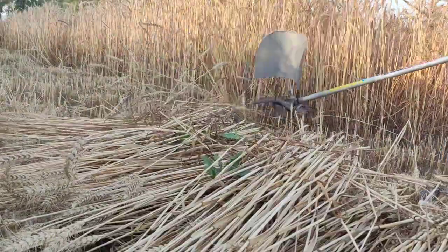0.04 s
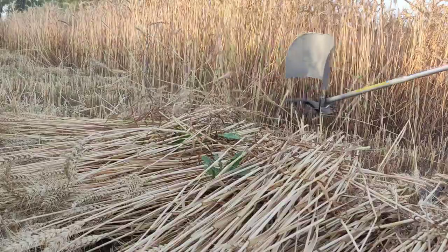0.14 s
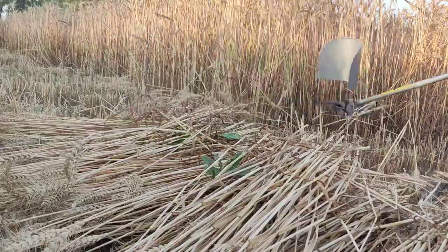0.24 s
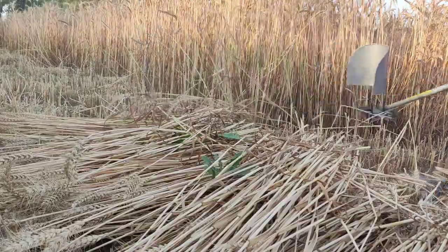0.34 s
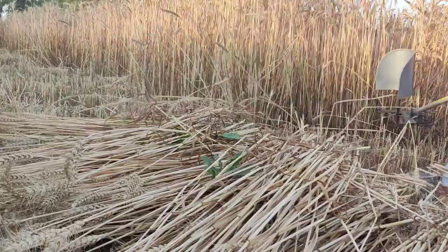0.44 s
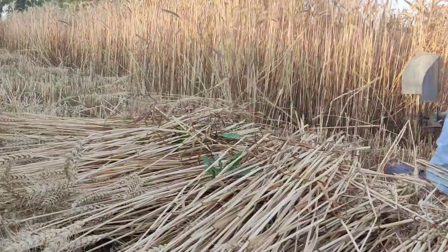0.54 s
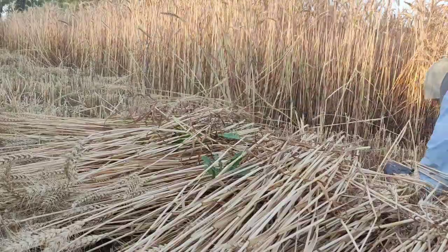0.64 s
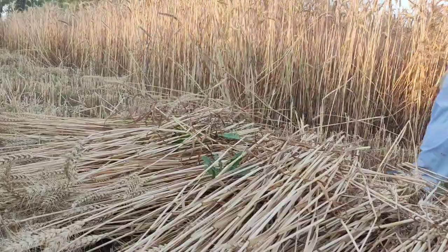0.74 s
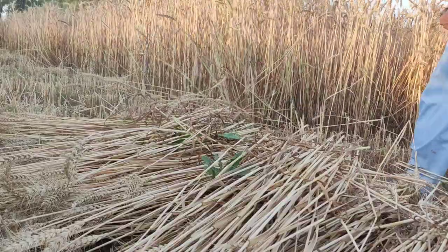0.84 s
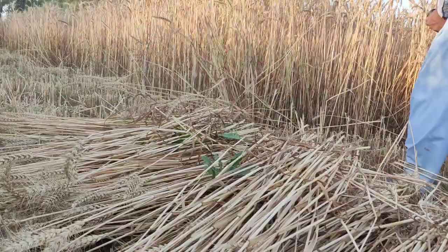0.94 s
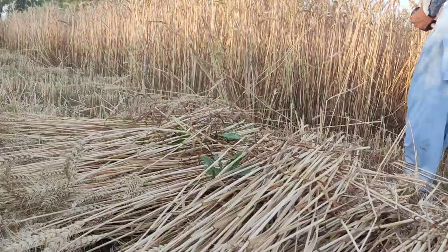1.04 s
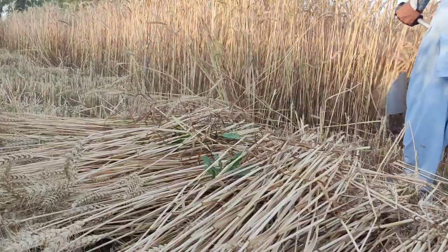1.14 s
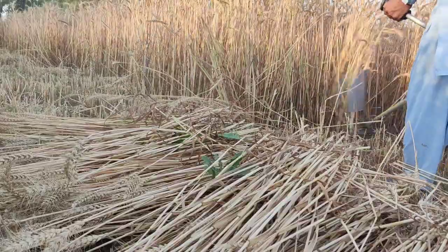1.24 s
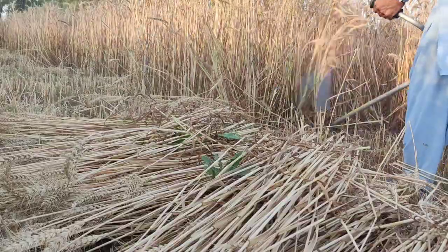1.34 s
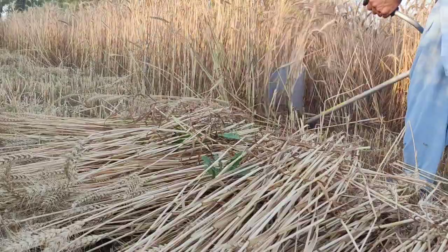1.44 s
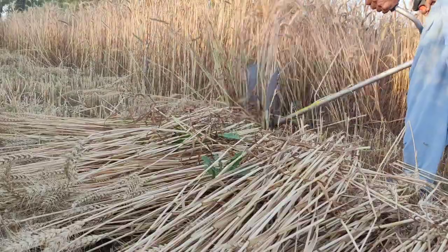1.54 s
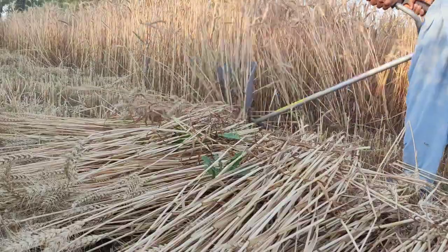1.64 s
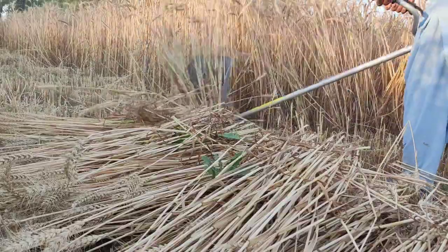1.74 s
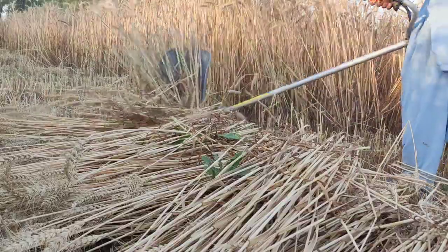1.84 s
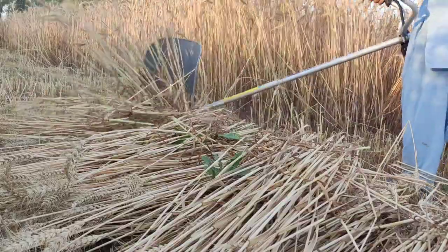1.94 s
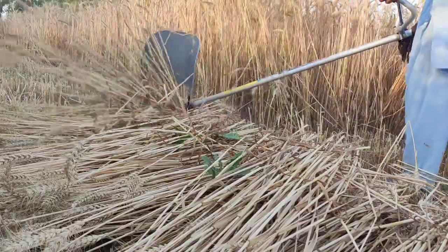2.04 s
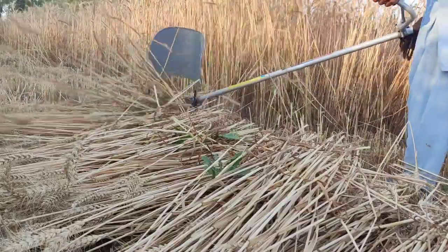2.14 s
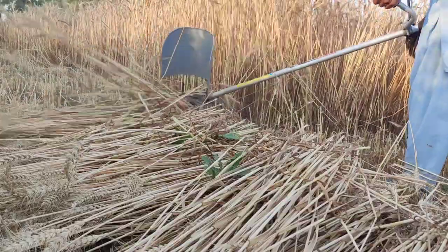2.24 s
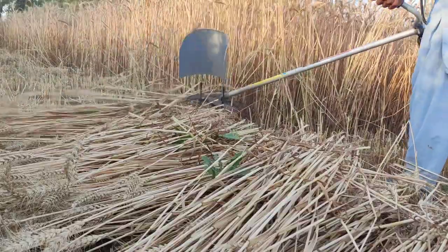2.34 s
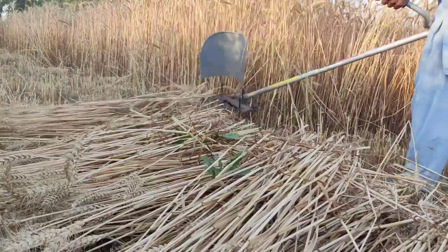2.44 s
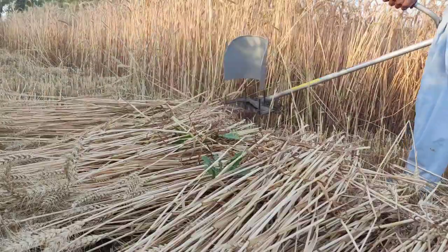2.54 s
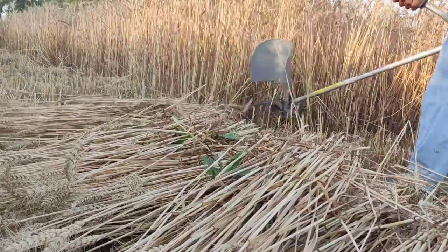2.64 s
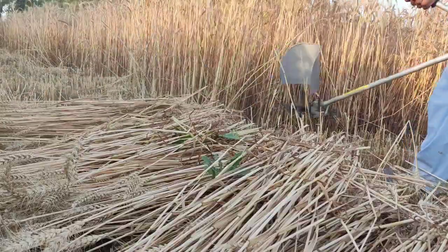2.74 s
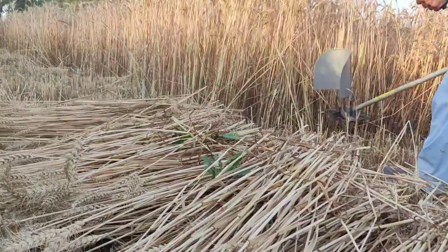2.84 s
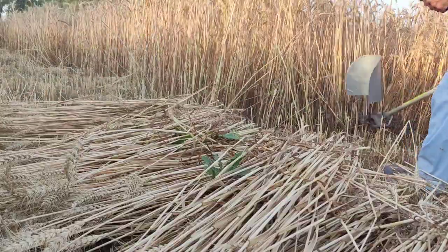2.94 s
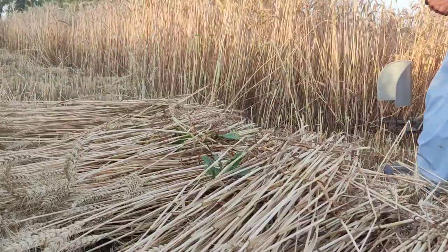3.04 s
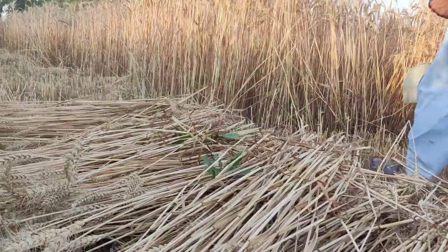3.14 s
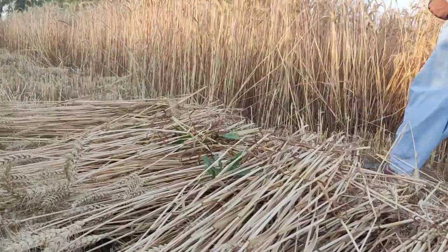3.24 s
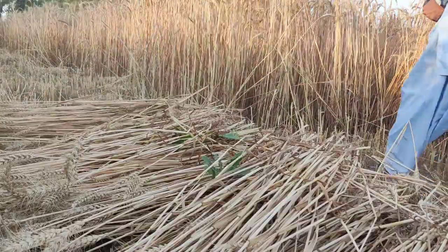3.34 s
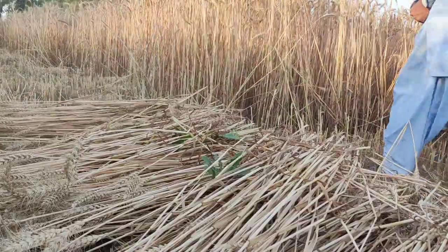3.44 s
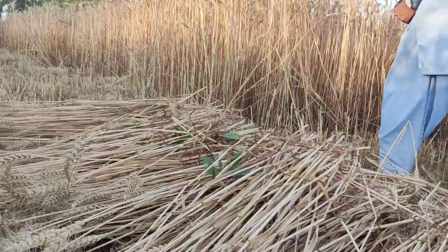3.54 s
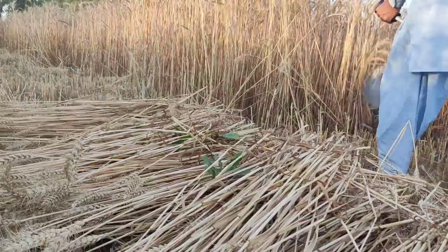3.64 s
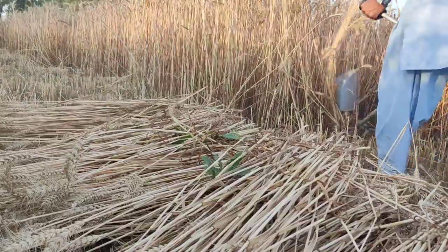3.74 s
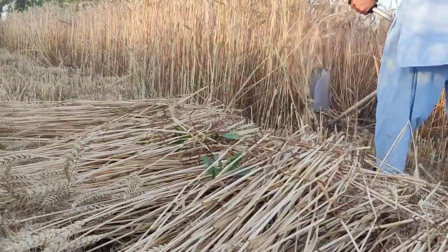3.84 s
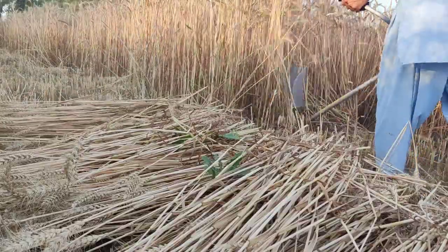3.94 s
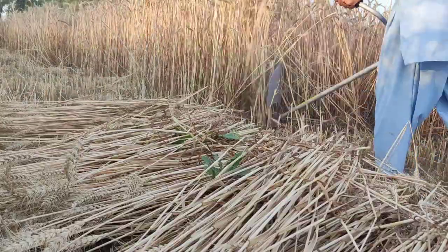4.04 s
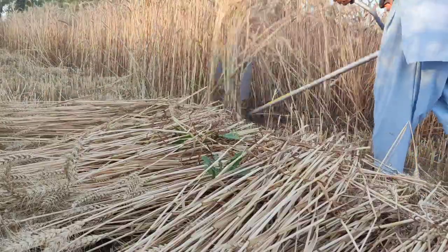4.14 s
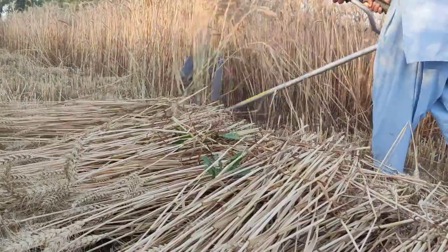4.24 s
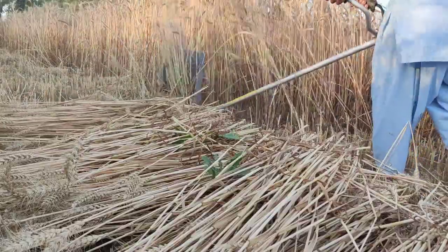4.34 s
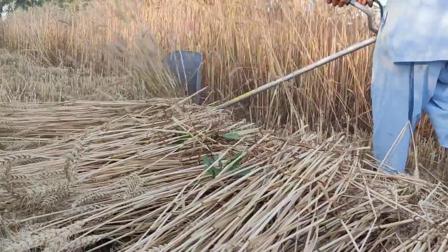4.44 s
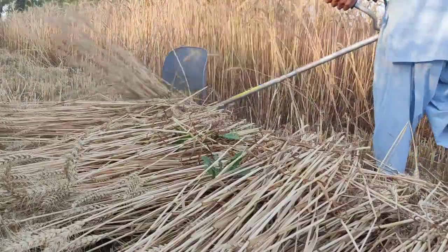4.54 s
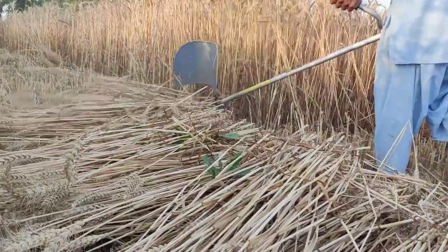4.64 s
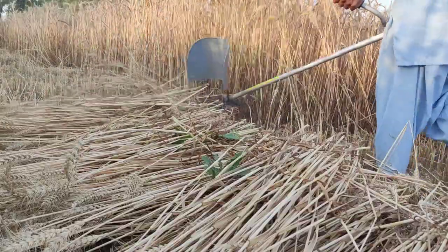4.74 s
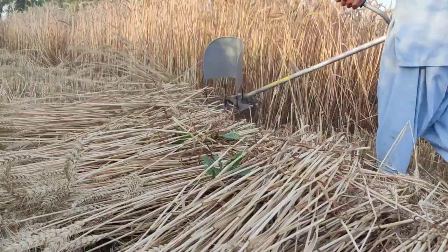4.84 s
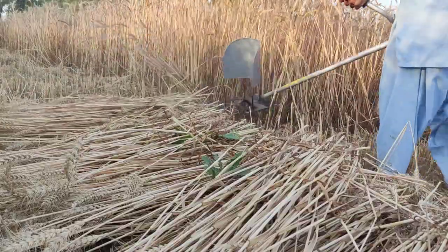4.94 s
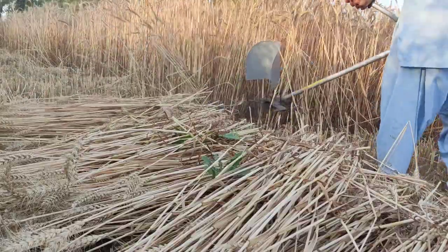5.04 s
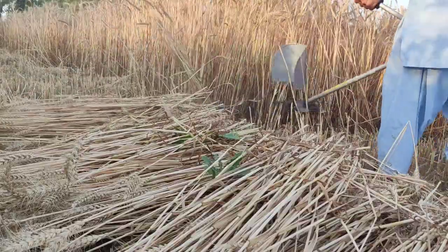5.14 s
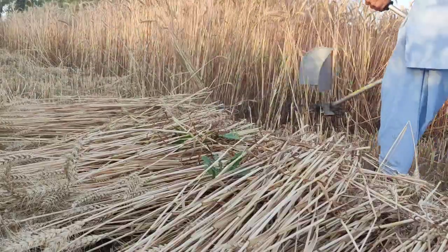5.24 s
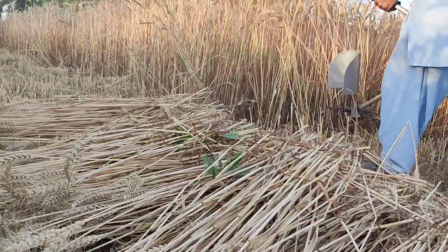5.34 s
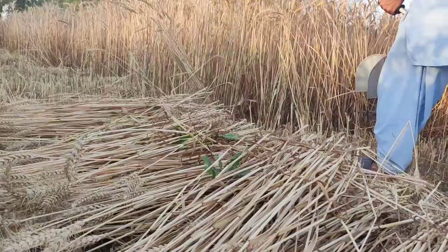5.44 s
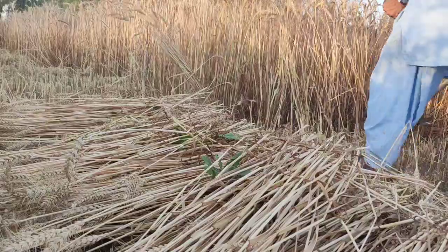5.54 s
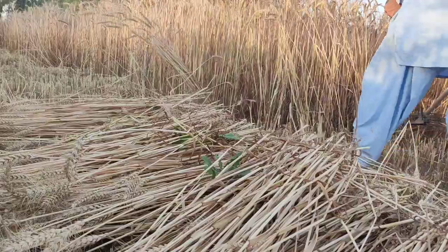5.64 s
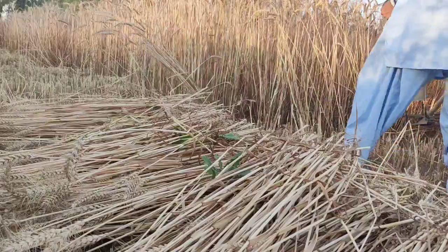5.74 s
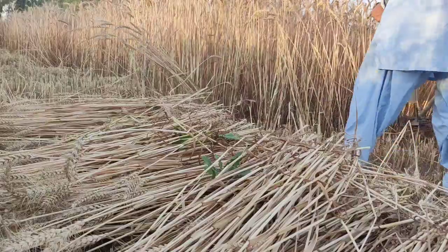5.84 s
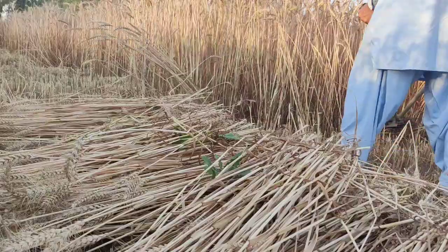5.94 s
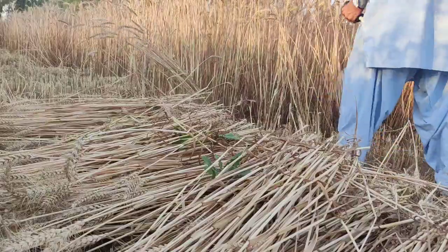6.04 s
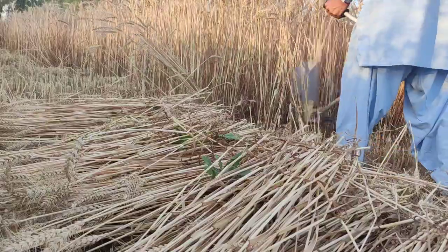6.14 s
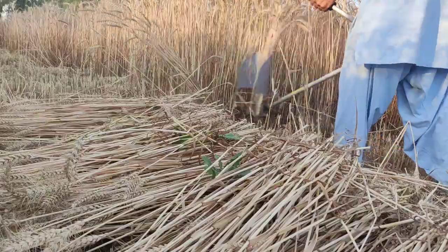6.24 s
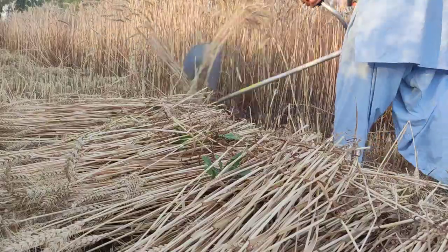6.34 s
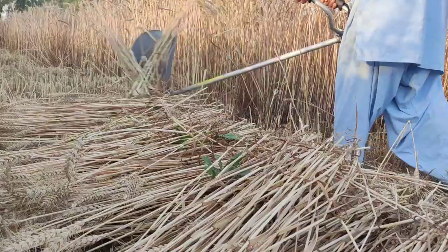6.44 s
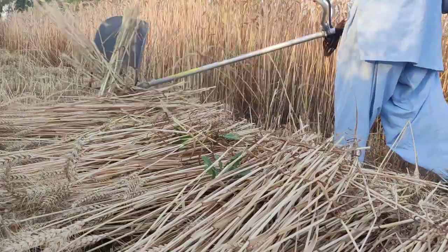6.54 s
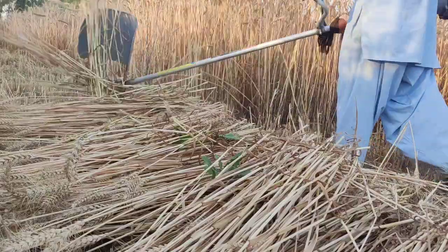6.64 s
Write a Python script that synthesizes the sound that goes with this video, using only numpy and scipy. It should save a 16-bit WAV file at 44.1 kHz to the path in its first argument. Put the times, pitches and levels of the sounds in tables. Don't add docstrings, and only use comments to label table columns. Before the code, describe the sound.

Close four-stroke engine rattle rises and falls three times as a steel blade crackles, roars and rings through dry crop stalks.

```python
import sys
import numpy as np
from scipy import signal
from scipy.fft import rfft, irfft, next_fast_len
from scipy.io import wavfile
from scipy.ndimage import uniform_filter1d

SR = 44100
rng = np.random.default_rng(int(sys.argv[2]) if len(sys.argv) > 2 else 0)


def inscribe(sig):
    pcm = np.round(np.clip(np.atleast_2d(sig).T, -1, 1) * 32767)
    wavfile.write(sys.argv[1], SR, pcm.astype(np.int16))


def ratio(d):
    e = np.asarray(d, float) / 20
    return 10 ** e


N = 295470
T = np.arange(N) / SR


def unit(x):
    return x / np.sqrt(np.mean(x ** 2) + 1e-20)


def along(points, hz):
    f, v = np.transpose(points)
    return np.interp(np.log(hz + 1), np.log(f + 1), v)


def curves(rows):
    s, *cols = np.transpose(rows)
    return [np.interp(T, s, c) for c in cols]


def wobble(rate):
    knots = rng.standard_normal(int(N * rate / SR) + 4)
    return np.interp(T * rate, np.arange(len(knots)), knots) * 1.15


def hiss():
    return rng.standard_normal(N)


def filtered(x, response):
    m = next_fast_len(N + 8192)
    return irfft(rfft(x, m) * response(np.fft.rfftfreq(m, 1 / SR)), m)[..., :N]


def noise(spectrum):
    return unit(filtered(hiss(), lambda hz: ratio(along(spectrum, hz))))


def resonant(x, peaks):
    def gain(f):
        total = 0
        for k, (centre, width, db) in enumerate(peaks):
            damping = 1j * f * width
            total = total + (-1) ** k * ratio(db) * damping / (centre * centre - f * f + damping)
        return total
    return unit(filtered(x, gain))


def swell(full, ends, entry, db, sag, fall):
    rise_db = -20 * np.maximum(full - T, 0) / abs(entry)
    return ratio(db + rise_db - sag * np.clip(T - full, 0, None) - fall * np.maximum(T - ends, 0))


# frequency in Hz, share 0-1.
COMMON = [(100, 0.97), (800, 0.96), (1500, 0.86), (3000, 0.55), (7000, 0.043), (15000, 0.43)]


def placed(x, lag, pan_db):
    direct = np.array([np.interp(np.arange(N) - lag, np.arange(N), x), x])
    hz, _, z = signal.stft(direct, SR, nperseg=256)
    drift = uniform_filter1d(rng.standard_normal(z.shape), 3, 1)
    drift = unit(uniform_filter1d(drift, 150, 2))
    share = np.clip(along(COMMON, hz), 0, 1)[:, None]
    scattered = z * np.exp(1.6j * np.sqrt(1 - share) * drift)
    both = signal.istft(scattered, SR, nperseg=256)[1][:, :N]
    return both * ratio([pan_db / 2, -pan_db / 2])


# starts to open in seconds, time to open in seconds, shuts in seconds.
THROTTLE = [
    (0.619, 0.36, 2.02),
    (3.06, 0.061, 4.62),
    (5.551, 0.09, 7),
]


def throttle():
    return sum(np.interp(T, [s, s + ramp, shut, shut + 0.07], [0, 1, 1, 0]) for s, ramp, shut in THROTTLE)


# time in seconds, firings per second.
FIRING = [(0.0, 30.02), (0.31, 27.86), (0.57, 27.25), (1.01, 33.15), (1.39, 38.6), (1.67, 38.59),
          (1.99, 33.39), (2.22, 27.36), (2.99, 27.59), (3.19, 31.8), (3.37, 32.81), (3.86, 41.38),
          (4.59, 38.34), (4.88, 32.38), (5.53, 27.48), (5.73, 31.89), (6.28, 40.85), (6.7, 40.83)]


def crank():
    rate, = curves(FIRING)
    return np.cumsum(rate) / SR - 0.4 + 0.003 * wobble(22)


# frequency in Hz, dB per Hz.
CROP_RASP = [(600, -30), (900, 0), (1280, 3), (1500, -3), (1720, 1), (2500, -0.5), (3500, -2.5), (5500, -8),
             (8000, -9), (15000, -29)]
# time in seconds, level in dB.
NEARNESS = [(0, 7.5), (.6, -4.5), (1.3, -6), (2.0, 8), (2.6, 2), (3.2, -7), (3.8, 2), (4.7, 8), (5.3, 5),
            (5.7, 4), (6.1, 4.5), (6.7, 12)]


def standing_crop(turn):
    pulse = 1.13 + np.exp(-((turn + 0.11) % 1) / 0.36)
    return ratio(-42 + curves(NEARNESS)[0]) * pulse * np.array([noise(CROP_RASP), noise(CROP_RASP)])


def exhaust(turn, modes, orders, scatter_db):
    t, out = T[:SR // 8], np.zeros(N)
    sizes = ratio(scatter_db * rng.standard_normal(int(turn[-1]) + 3))
    for at in sorted({row[0] for row in modes}):
        cycle, ring = np.floor(turn - at).astype(int), 0
        for _, delay_ms, hz, size, t60 in (row for row in modes if row[0] == at):
            u = np.maximum(t - delay_ms / 1000, 0)
            onset = 1 - np.exp(-u / 0.0005)
            ring = ring + size * ratio(-60 * u / t60) * np.sin(2 * np.pi * hz * u) * onset
        steps = np.r_[0, np.diff(cycle)] * sizes[cycle]
        out += signal.oaconvolve(steps, ring)[:N]
    return unit(out - sum(size * np.cos(2 * np.pi * k * (turn - trough)) for k, size, trough in orders))


# share of the cycle, delay in ms, frequency in Hz, signed size, t60 in seconds.
OPEN_MODES = [(-.144, 0, 185, .17, .045), (-.144, .7, 582, .28, .029), (.182, 1, 690, .04, .04),
              (-.144, 4.8, 593, .1, .03), (.182, .7, 112, .04, .09), (.182, 0, 530, -.24, .02),
              (.563, 0, 554, -.056, .016), (-.144, 1.5, 320, .05, .06)]
SHUT_MODES = [(-.097, 1.5, 228.6, 0.086, 0.045), (-.097, 1, 630, 0.074, 0.034),
              (-.097, 4, 690, 0.085, 0.033), (-.097, 4, 742, 0.034, 0.058), (0.146, 1.5, 106, -.14, 0.028),
              (.148, 3.5, 424, -0.13, 0.0065), (0.596, 0, 718, -0.026, .06),
              (-.097, 1.15, 850, 0.0078, 0.083), (-.097, 1, 535, 0.015, 0.042)]
CRANK_OPEN = [(1, 0.036, -0.11), (2, 0.049, 0.15)]
CRANK_SHUT = [(1, 0.0052, -0.24), (2, 0.011, 0.0037), (3, 0.0076, 0.09)]


def exhaust_note(turn, load):
    firings = np.gradient(turn) * SR
    hot = np.clip((firings - 26.9) / 12.9, 0, 1)

    def shifted(by):
        return [(at, ms, hz * (1 + by * (0.055 if hz < 250 else 0.025)), *rest)
                for at, ms, hz, *rest in OPEN_MODES]
    cool, warm = (exhaust(turn, shifted(by), CRANK_OPEN, scatter_db=0.5) for by in (-1, 1))
    shut = exhaust(turn, SHUT_MODES, CRANK_SHUT, scatter_db=0.7)
    return load * (cool + hot * (warm - cool)) + (1 - load) * shut


# frequency in Hz, width in Hz, dB at idle, dB at full throttle.
FINS = [(3000, 130, -11, -6.5), (4910, 49, 9, -1), (5530, 46, -18, -3), (5820, 110, 5, -16),
        (6030, 37, -25, 8), (6350, 57, 5.5, -13), (6770, 83, -12, 3), (7260, 37, -21, -11),
        (7910, 52, -36, 2.5)]


def knock(turn, load):
    cycle, since = np.divmod(turn + 0.235, 1)
    size = ratio(3 * rng.standard_normal(int(cycle[-1]) + 2))[cycle.astype(int)]
    seconds = since / np.gradient(turn) / SR
    grit = 0.067 * np.exp(-seconds / 0.0015) * hiss()
    crack = size * (np.r_[0, np.diff(cycle)] + grit)
    idle, hard = (resonant(crack, [(hz, width, db[k]) for hz, width, *db in FINS]) for k in range(2))
    return ratio(-13) * (1 - load) * idle + ratio(-7.5) * load * hard


def clutch_drum(load):
    drum = resonant(hiss(), [(935, 380, -17.0), (1310, 25, 0.0), (1700, 160, 6.0)])
    off_load = T - np.maximum.accumulate(T * (load > 0.5))
    slack = np.clip(off_load / 0.53, 0.6, 1)
    return ratio(-7 + wobble(3.12)) * (1 - load) * slack ** 2 * drum


# frequency in Hz, width in Hz, level in dB.
COVERS = [(1340, 73, 9), (1710, 28, 6.5), (2430, 67, -33), (2960, 74, -25), (5920, 780, -2),
          (6520, 760, -9), (6400, 89, 10), (7030, 1020, 5.5), (8210, 110, 5.5)]
# frequency in Hz, dB per Hz.
CASING = [(530, -20), (900, -13), (967, -7), (1290, -2), (1770, -7), (2040, -5), (2930, -3.5), (4150, -9.5),
          (6890, -3.5), (8050, -9), (8760, -15), (14900, -21.5), (16000, -25)]


def covers_and_casing(turn, load):
    since = (turn + 0.266) % 1
    bang = ratio(0.73 * wobble(30)) * (1 - np.exp(-since / 0.0089)) * np.exp(-since / 0.079)
    opening = np.clip(load - uniform_filter1d(load, SR // 4, origin=SR // 9), 0, 1)
    bang *= 1 + 0.8 * opening
    covers = resonant(hiss() * (0.1 + bang), COVERS)
    blow = np.exp(-((turn + 0.11) % 1) / 0.1)
    casing = unit(noise(CASING) * (0.5 + 0.5 * bang + 0.35 * blow))
    return ratio(-10 + 6.4 * load) * covers + ratio(-1.5 + 0.61 * load) * casing


# time in seconds, level in dB at shut throttle.
EXHAUST = [(0, -28), (.7, -26.5), (1.2, -25.5), (1.6, -31), (2.0, -33.5), (2.3, -29.5), (3.0, -28.5),
           (3.7, -24.5), (4.2, -30), (4.45, -30), (4.75, -31), (4.95, -27.5), (5.6, -27), (6.15, -25.5),
           (6.7, -30)]


def engine(turn):
    load = throttle()
    puff = noise([(20, -27), (60, -31), (300, -15.5), (650, 21.0), (900, -8.5), (1300, -43)])
    mechanical = knock(turn, load) + covers_and_casing(turn, load) + clutch_drum(load)
    level_db = curves(EXHAUST)[0] + 3.5 * load
    return ratio(level_db) * (exhaust_note(turn, load) + mechanical + ratio(-16) * puff)


# time in seconds, peak in dB, brightness in Hz.
SNAPS = [
    (1.251, -3, 10000),
    (1.9424, -16, 9000),
    (3.7284, -12, 9000),
    (3.8656, -8, 9500),
    (4.214, -6, 9000),
    (5.0646, -23, 14000),
    (5.1547, -20, 9500),
    (6.3036, -8, 9500),
    (6.4822, -7, 8500),
]


def snaps():
    out, t = np.zeros(N + SR), T[:SR // 20]
    for s, db, hz in SNAPS:
        sos = signal.butter(2, [0.65 * hz, min(1.5 * hz, 20000)], 'band', fs=SR, output='sos')
        puff = unit(signal.sosfilt(sos, rng.standard_normal(len(t))))
        out[round(s * SR):][:len(t)] += ratio(db - 8 - 60 * t / 0.057) * puff
    return out[:N]


# start in seconds, end in seconds.
SWING = [
    (1.202, 1.8),
    (3.86, 4),
    (6.3, 7.16),
]
# left lag in samples, left-right balance in dB.
REST = (11, -1.1)
RIGHT = (1.9, -0.3)
LEFT = (-3, 1.6)


def swing():
    back_s = 0.311
    path = []
    for a, b in SWING:
        path += [(s, *place) for s, place in [(a - back_s, REST), (a, RIGHT), (b, LEFT), (b + back_s, REST)]]
    return curves(path)


# full bite in seconds, leaves in seconds,
# entry time in seconds, chopping in dB, plate roar in dB.
CUT = [(1.356, 1.7, 0.26, -24, -9.5), (1.774, 2.03, 0.16, -21.5, -10.5), (2.077, 2.384, 0.09, -29, -22),
       (3.866, 4.154, 0.049, -26.5, -11.5), (4.226, 4.556, 0.27, -24, -16.5),
       (4.54, 4.601, 0.073, -36, -40), (4.705, 4.916, 0.12, -29.5, -31), (5.07, 5.075, .01, -47, -45),
       (5.169, 5.178, 0.024, -40, -20.5), (6.397, 6.432, 0.36, -25, -10.5),
       (6.486, 6.485, 0.0091, -19.5, -23), (6.548, 6.666, 0.085, -25, -14.5)]
# frequency in Hz, dB per Hz.
STALKS = [(530, -16), (900, -15.5), (991, -21), (1200, -17.5), (2300, -13), (5040, -12), (6800, -6.5),
          (9650, -9.5), (14900, -14), (16000, -18)]
# frequency in Hz, level in dB.
SPRAY = [(1500, -24), (6000, -28), (10500, 0.5), (12200, 0), (14500, -0.5), (16000, -3)]


def chopping(load, clumps):
    level = ratio(-37) * load
    for full, ends, entry, db, _ in CUT:
        bite = swell(full, ends, entry, db, sag=20, fall=240)
        trail = swell(full, ends, entry, db - 20, sag=20, fall=87)
        level = level + np.maximum(bite, trail)
    spray = unit(noise(SPRAY) * ratio(3 * (wobble(30) + wobble(700))))
    return level * (unit(noise(STALKS) * clumps) + ratio(-10.5) * spray)


# frequency in Hz, width in Hz, level in dB.
ROAR = [(6100, 100, -23), (6470, 31, 3), (6985, 150, -3.5), (7570, 160, 1.5), (8120, 380, 3)]
# frequency in Hz, width in Hz, level in dB.
SING = [(3980, 19, -3), (4480, 27, 4.5), (4650, 16, -3.5), (5600, 24, -7), (5700, 19.3, 0), (6570, 18, -2),
        (6780, 16, -6.5), (7040, 27, -13), (7215, 7.3, 5.5), (7290, 27, -4.5), (7350, 33, 0),
        (8260, 18, -1), (9140, 27, -11), (9706, 43, -1)]


def plate_roar(load, clumps, tooth):
    level = ratio(-43) + ratio(-70) * load
    level = level + sum(swell(a, b, entry, db, sag=18.6, fall=240) for a, b, entry, _, db in CUT)
    bite = 0.55 * unit(wobble(900) * np.sin(6 * np.pi * tooth))
    roar = resonant((hiss() + bite) * clumps * ratio(1.4 * wobble(29)), ROAR)
    sing = resonant((hiss() + bite) * clumps, SING)
    return level * (roar + ratio(-4) * sing)


# full in seconds, ends in seconds,
# entry time in seconds, level in dB, sag in dB per second.
WHINE = [
    (1.72, 2.074, 0.13, -12.5, 7.5),
    (2.154, 2.286, 0.083, -17.5, 8),
    (4.19, 4.594, 0.12, -11, 20),
    (4.622, 4.88, .12, -20, 2),
    (6.453, 6.8, 0.25, -18, -27),
]
# frequency in Hz, level in dB.
RADIATES = [(1400, -10.5), (1750, 0.5), (2050, -4.5), (2400, -6.5), (3100, 1), (3900, -4), (4650, -2),
            (5800, -6), (6900, 1.5), (8000, 4), (9700, -10), (12000, -12), (16000, -24)]
# frequency in Hz, width in Hz, level in dB.
TEETH = [(2405, 19, -0.5), (2730, 23, -8), (3130, 40, -1.5), (4700, 34, -6), (5940, 40, -7), (6600, 42, -1),
         (7300, 66, 7), (7770, 110, -9), (9940, 51, -8)]


def tooth_whine(tooth):
    overtones = 0
    for k in range(1, 8):
        overtones = overtones + (0.55 + wobble(170 + 50 * k)) * np.sin(2 * np.pi * k * tooth)
    whine = unit(filtered(overtones, lambda hz: ratio(along(RADIATES, hz))))
    whine += ratio(-3.5) * resonant(overtones, TEETH)
    return sum(swell(*row, fall=98) for row in WHINE) * whine


# full in seconds, ends in seconds, entry time in seconds, level in dB.
FREE = [
    (2.351, 2.44, .12, -36),
    (4.557, 5.043, 0.13, -28.5),
]
# frequency in Hz, level in dB.
PLATE = [(4480, -0.5), (5880, 0), (6550, 1), (7300, -7), (8200, -1)]


def free_ring(turn):
    spin = np.cumsum(1 + 0.0064 * (np.gradient(turn) * SR - 34)) / SR
    ring = 0
    for hz, db in PLATE:
        ring = ring + ratio(db + 1.9 * wobble(5.4)) * (3.0 + wobble(40)) * np.sin(2 * np.pi * hz * spin)
    return sum(swell(*row, sag=7.2, fall=59) for row in FREE) * unit(ring)


# time in seconds, teeth per second.
BLADE = [(1.2, 2200), (1.45, 2225), (1.72, 2285), (1.91, 1990), (2.02, 1935), (2.1, 1746), (2.17, 1610),
         (2.25, 1563), (2.33, 1455), (2.5, 1425), (3.85, 2412), (4.22, 2399), (4.51, 2328), (4.68, 2219),
         (4.77, 2030), (4.95, 1950), (6.3, 2400), (6.55, 2455)]


def blade(turn):
    load = throttle()
    tooth = np.cumsum(curves(BLADE)[0]) / SR
    tooth += 0.059 * wobble(70)
    clumps = ratio(1.1 * wobble(45) + 1.1 * wobble(500))
    plate = plate_roar(load, clumps, tooth) + tooth_whine(tooth)
    cut = ratio(4.0) * chopping(load, clumps) + ratio(-7.5) * plate
    return placed(cut + snaps() + free_ring(turn), *swing())


def scene():
    turn = crank()
    lag, = curves([(0, 17.4), (3, 16.1), (6.7, 13.9)])
    return standing_crop(turn) + placed(engine(turn), lag, np.full(N, -1.2)) + blade(turn)


def low_pass(x):
    return signal.sosfilt(signal.butter(12, 16580, fs=SR, output="sos"), x)


# frequency in Hz, left-right difference in dB.
PORTS = [(60, 1), (400, 0), (800, 1), (2400, -1), (4400, -6), (7000, -3.5), (9000, 10), (11500, -3.5),
         (15000, -7)]


def record(dry):
    def ports(hz):
        return ratio(np.outer([0.5, -0.5], along(PORTS, hz))) * (hz > 15) * (hz < 15650)
    dip = np.interp(T - 4.015, [0, 0.015, 0.065, 0.076, 0.225], [0.035, 0.88, 0.83, 0.41, 0.06])
    x = filtered(dry, ports) * ratio(2 - 11 * dip)
    x = x / (1 + np.abs(x / 0.95) ** 6) ** (1 / 6)
    return low_pass(x)


dry = scene()
out = record(dry)
inscribe(out)
```